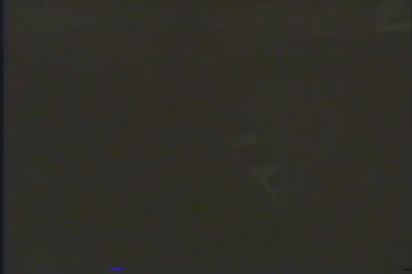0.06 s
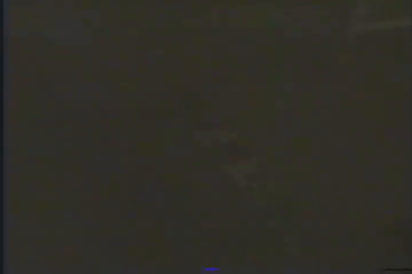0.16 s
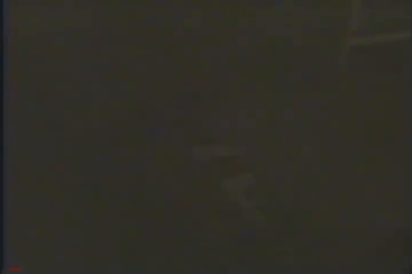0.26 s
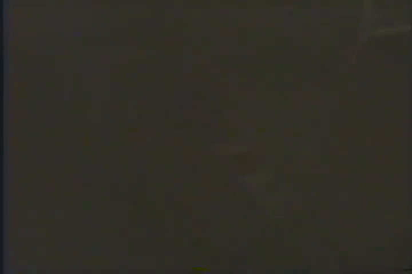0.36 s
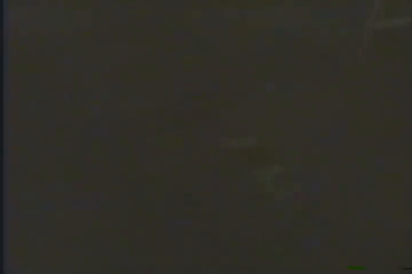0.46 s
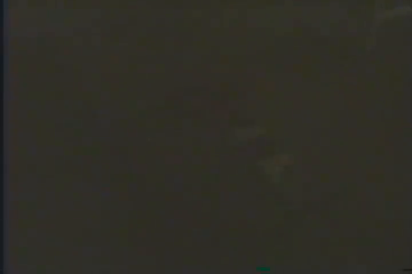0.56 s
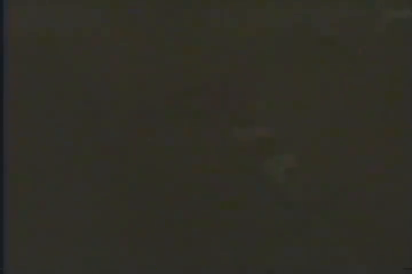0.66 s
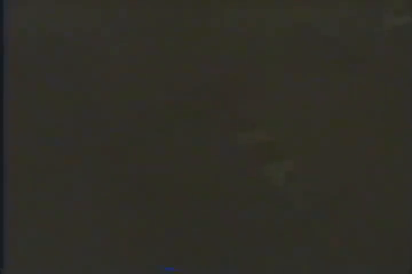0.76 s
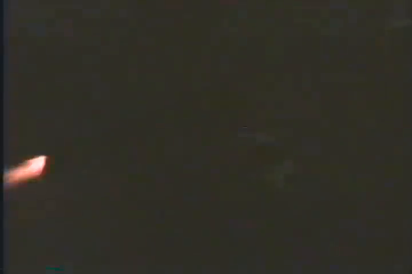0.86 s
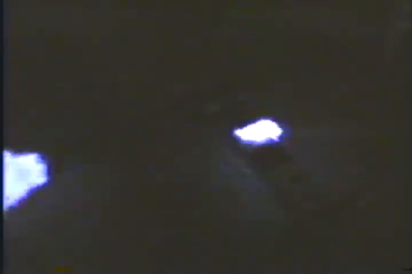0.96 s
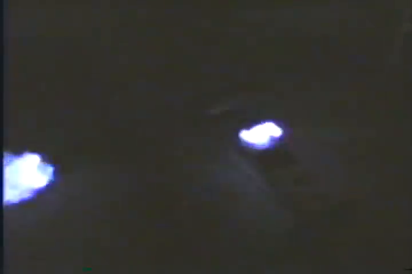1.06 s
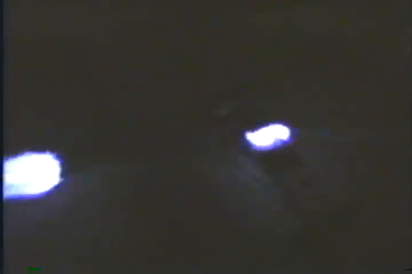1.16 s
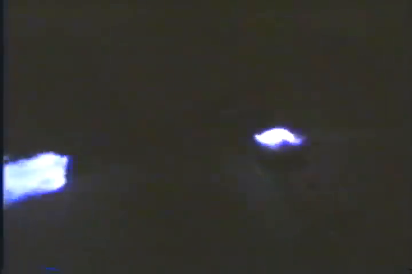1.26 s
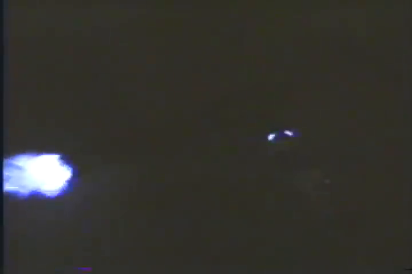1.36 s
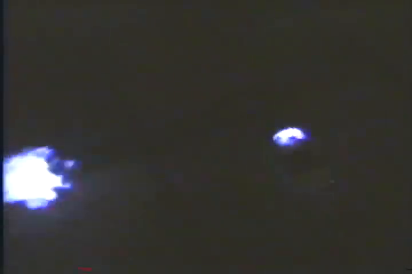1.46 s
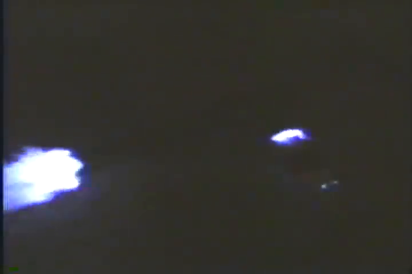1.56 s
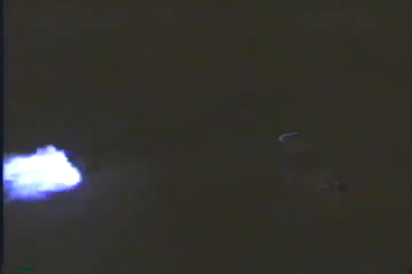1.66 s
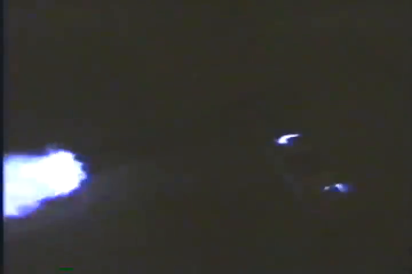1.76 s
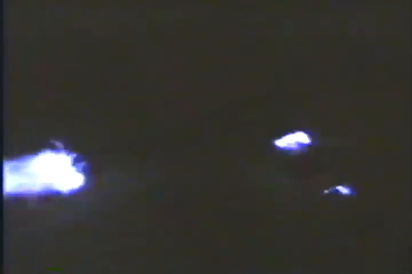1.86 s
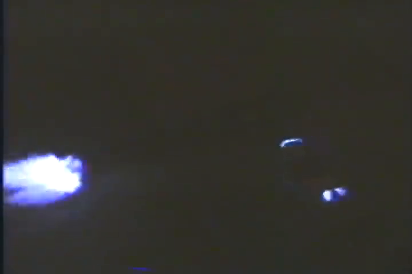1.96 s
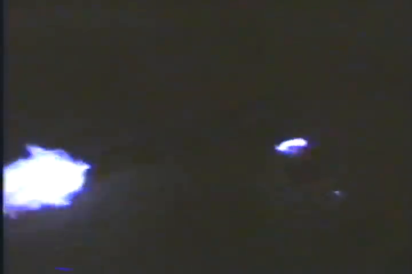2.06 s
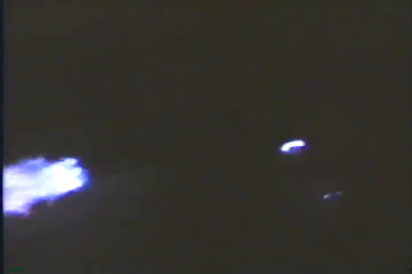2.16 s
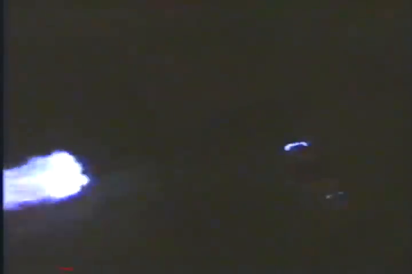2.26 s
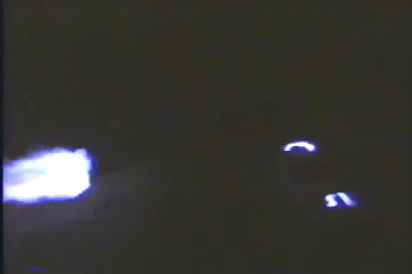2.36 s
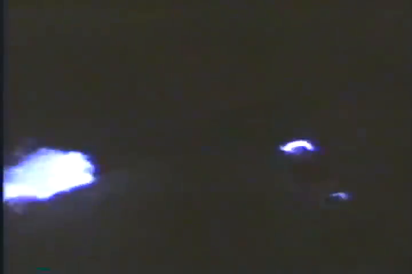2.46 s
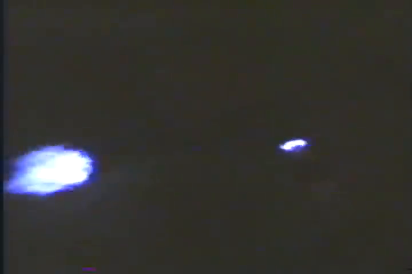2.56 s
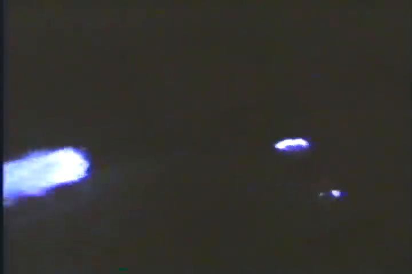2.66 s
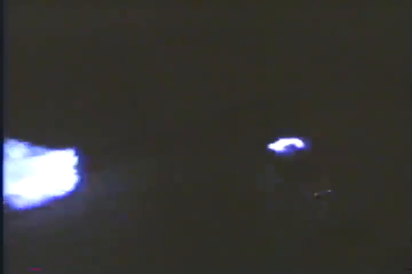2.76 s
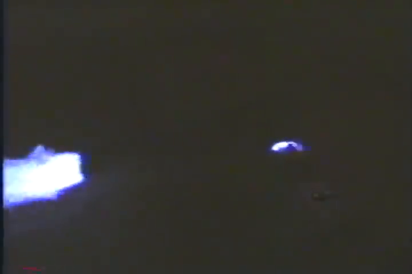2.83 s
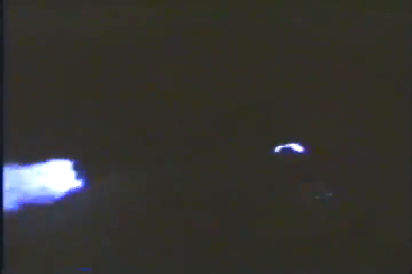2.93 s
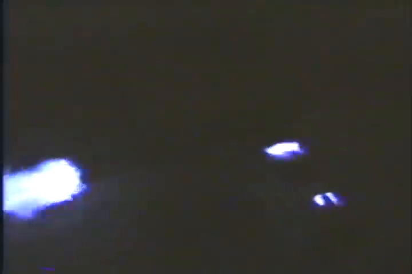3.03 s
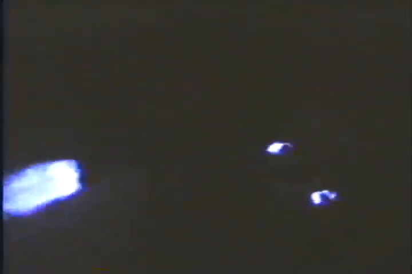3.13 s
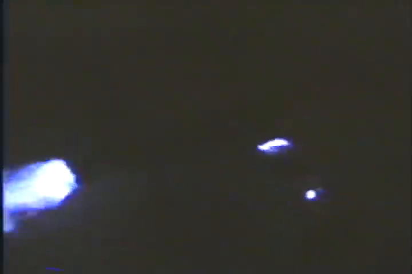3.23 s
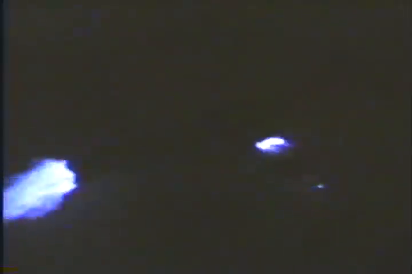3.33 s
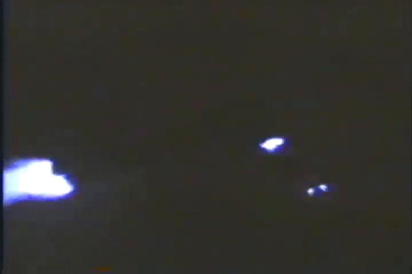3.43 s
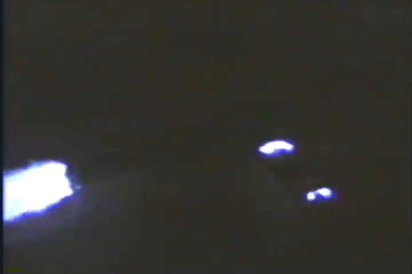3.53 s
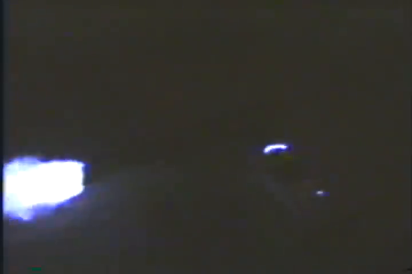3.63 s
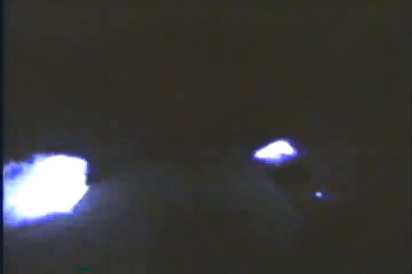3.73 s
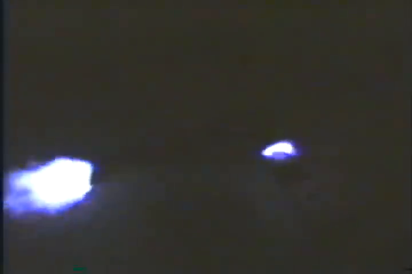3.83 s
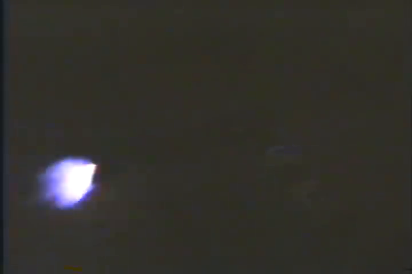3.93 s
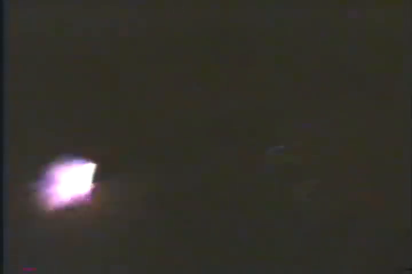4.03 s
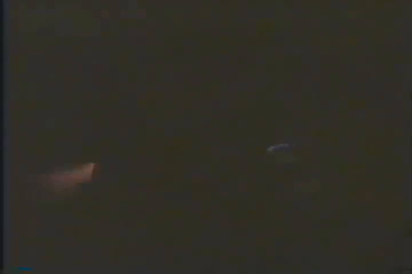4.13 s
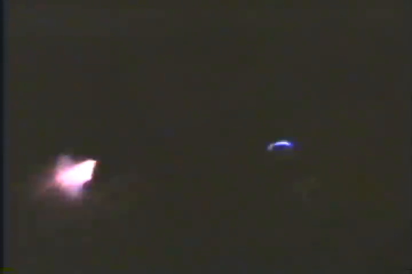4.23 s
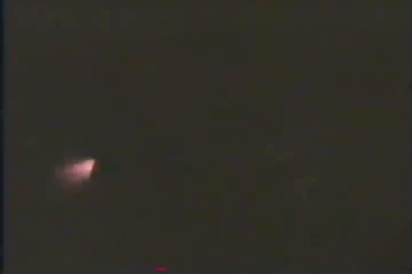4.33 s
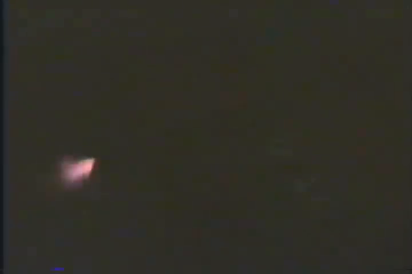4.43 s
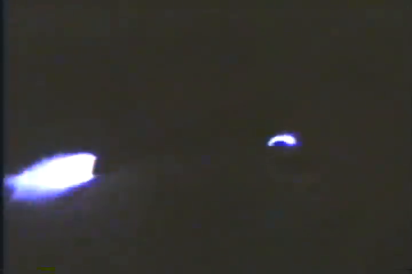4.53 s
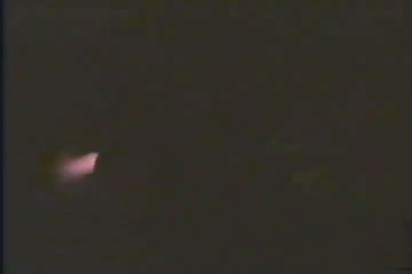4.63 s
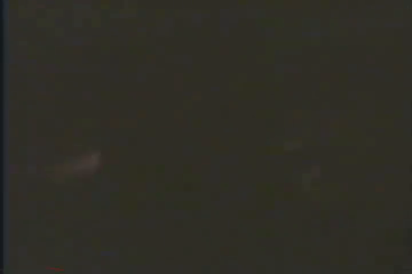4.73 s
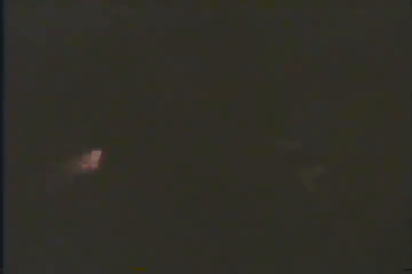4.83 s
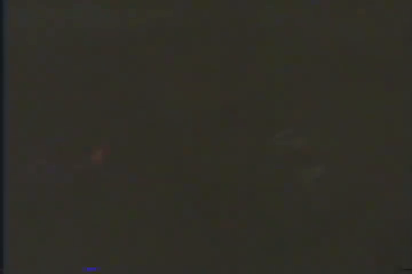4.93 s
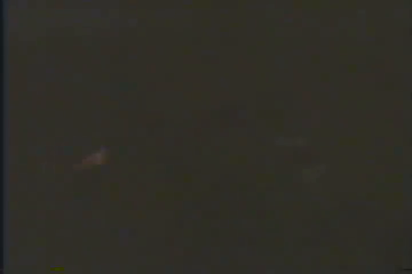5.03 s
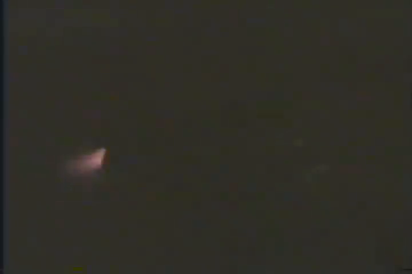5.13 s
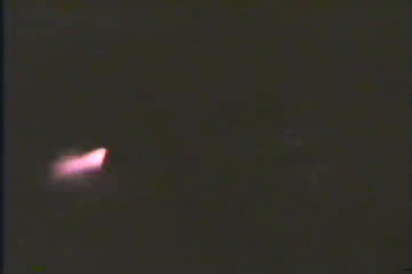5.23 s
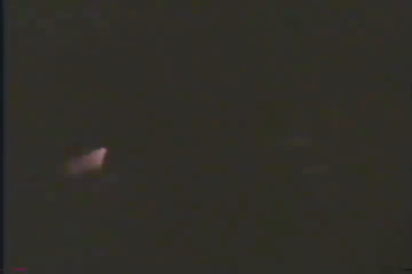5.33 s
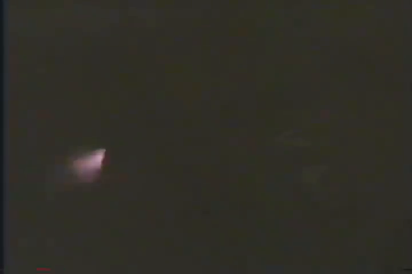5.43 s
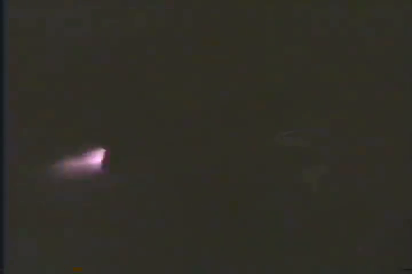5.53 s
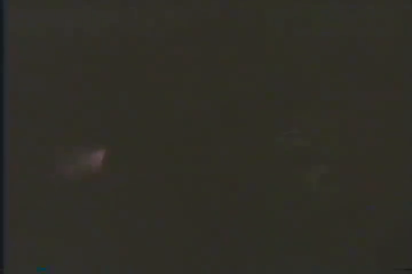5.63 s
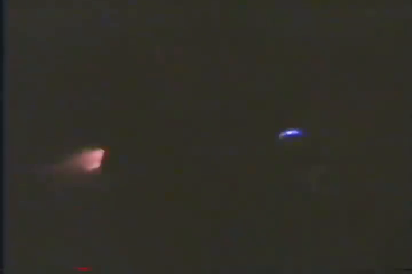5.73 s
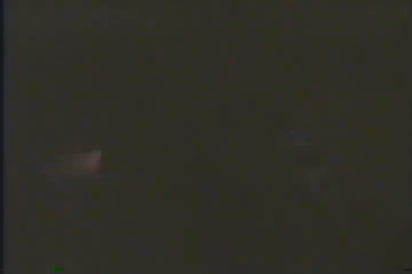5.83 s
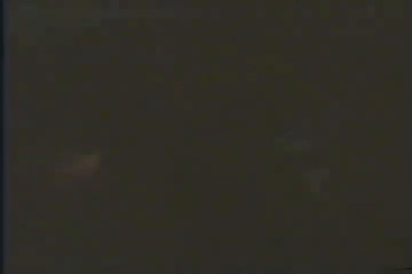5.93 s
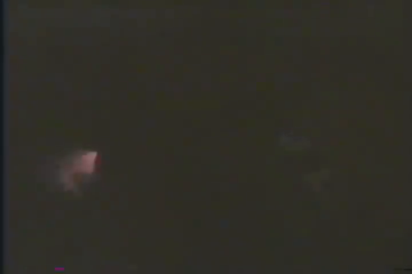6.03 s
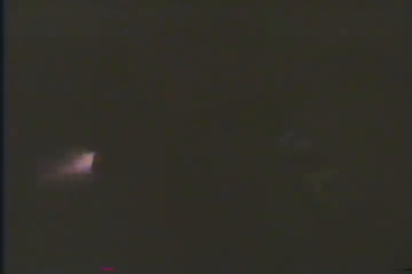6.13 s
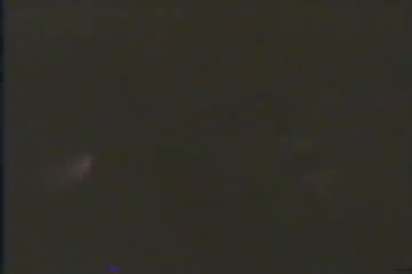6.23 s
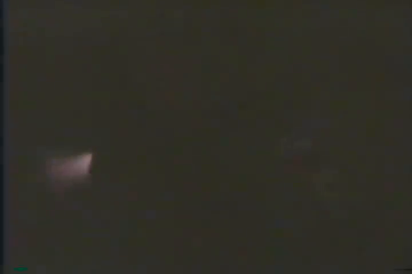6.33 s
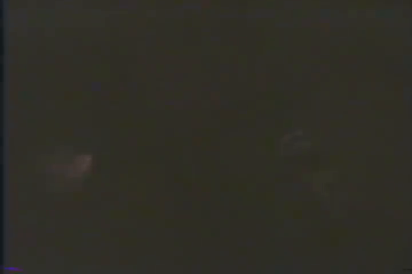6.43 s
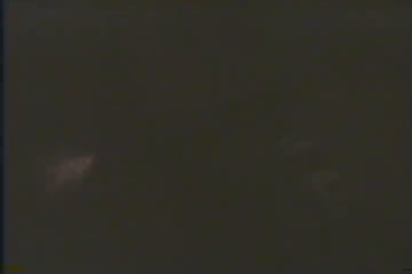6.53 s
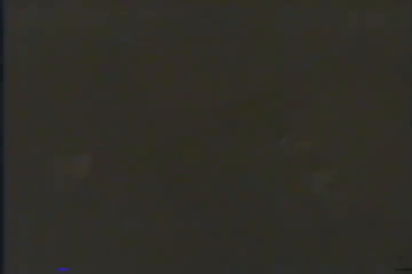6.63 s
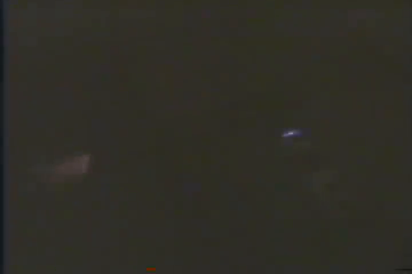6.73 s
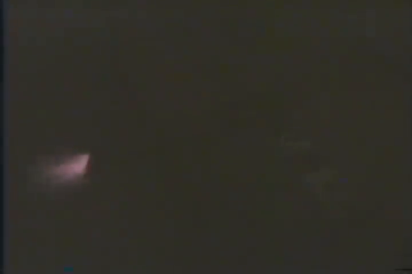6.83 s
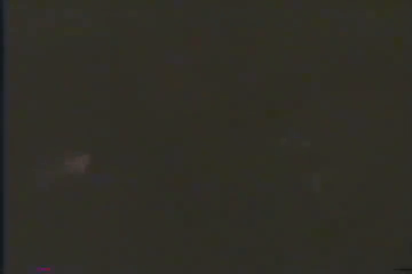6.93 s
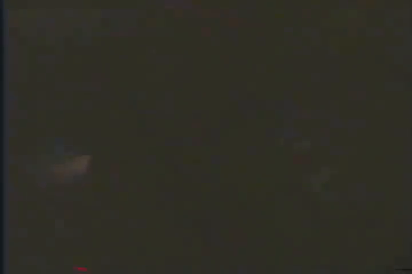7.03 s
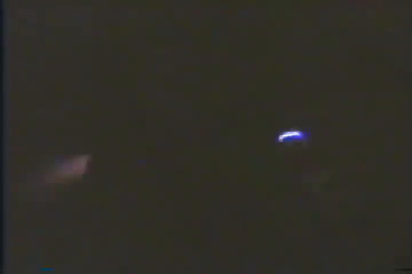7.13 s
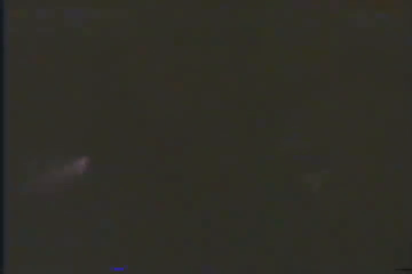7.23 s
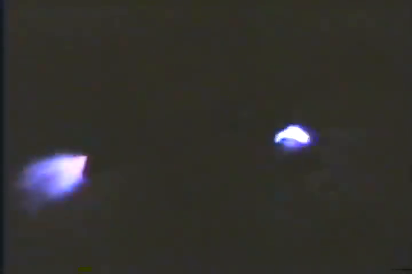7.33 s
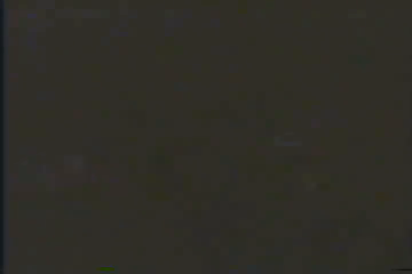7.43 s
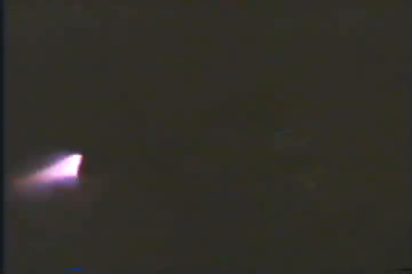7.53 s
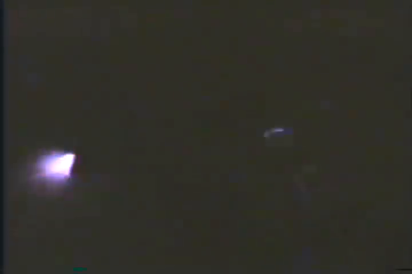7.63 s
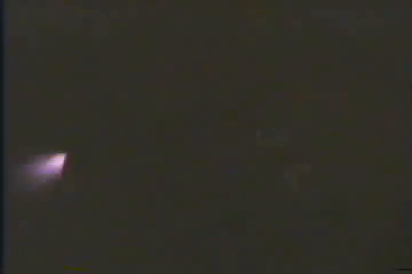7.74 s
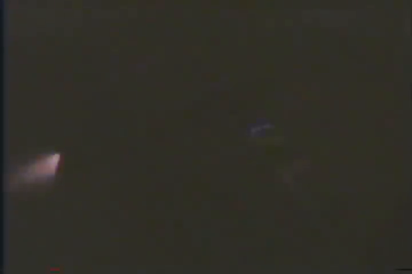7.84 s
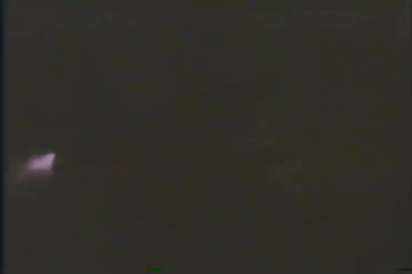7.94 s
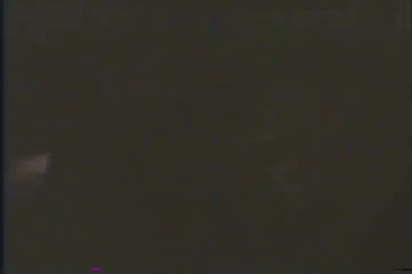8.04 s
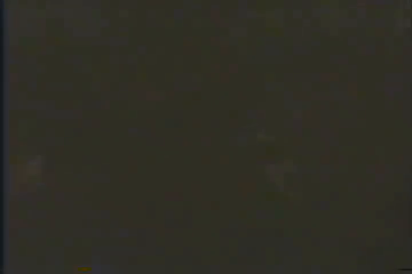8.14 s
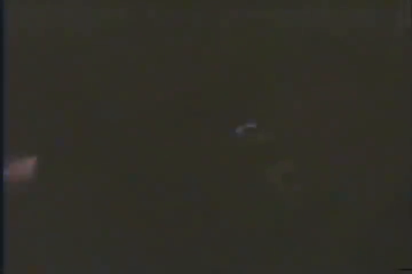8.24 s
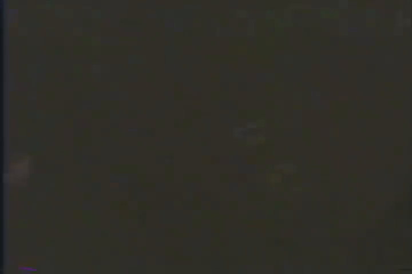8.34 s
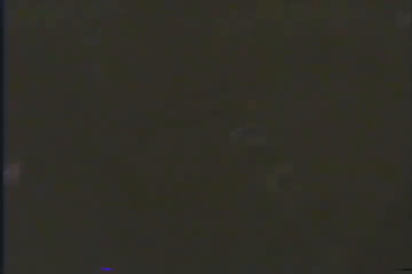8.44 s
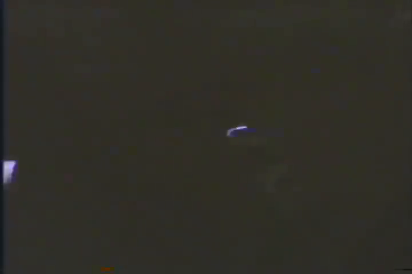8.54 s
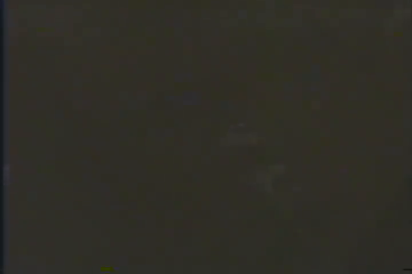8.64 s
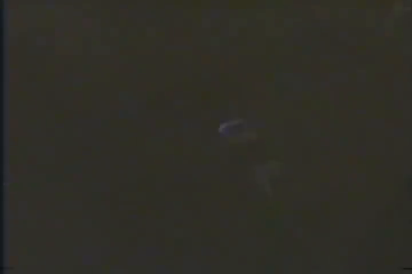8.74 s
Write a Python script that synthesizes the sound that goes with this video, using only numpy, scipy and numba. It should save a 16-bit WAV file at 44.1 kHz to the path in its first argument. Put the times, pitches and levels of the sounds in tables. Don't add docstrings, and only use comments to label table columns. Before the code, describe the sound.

Valve clicks and a rising cold gas hiss, then a bang lights a jet burner that sputters in puffs and locks into a loud distorted roar.

```python
import sys
import numpy as np
from scipy import signal
from scipy.fft import rfft, irfft, next_fast_len
from scipy.io import wavfile
from scipy.ndimage import uniform_filter1d
from numba import njit

SR = 44100
rng = np.random.default_rng(int(sys.argv[2]) if len(sys.argv) > 2 else 0)


def magnitude_from_level(level_db):
    exponent = np.asarray(level_db, float) / 20
    return 10 ** exponent


def wav_record(signal):
    frames = np.transpose(np.atleast_2d(signal))
    bounded = np.clip(frames, -1, 1)
    quanta = np.round(bounded * 32767).astype(np.int16)
    wavfile.write(sys.argv[1], SR, quanta)


N = 387638
T = np.arange(N) / SR
IGNITION_S = .908
PIPE_HZ = 206
CRACK_LEAD_S = 0.00636

# start_s, lower_hz, upper_hz, upper_over_lower_db
PIPE_MODES = [(4.0, 133.8, 196.7, 14), (4.25, 138.5, 193.6, -5.5), (4.6, 144.2, 188.6, 0),
              (4.8, 152.3, 183, -8), (5.45, 151.9, 183, -7.5), (5.7, 139.5, 195.7, -2.5),
              (6.0, 130.8, 187, 3.5), (6.5, 137, 196.7, 5), (6.9, 147.4, 194.7, 2.5), (7.2, 137, 189.7, 5),
              (7.5, 145.4, 197.5, 1.5), (8.15, 132.5, 205, 3.5), (8.45, 136.5, 195.3, 3.5),
              (8.79, 143, 195.1, 4.5)]
# start_s, peak_db
SURGES = [(4.109, -19), (4.303, -27), (4.579, -11.5), (4.732, -19.5), (4.809, -10), (4.871, -14),
          (4.981, -14), (5.194, -7.5), (5.338, -14), (5.553, -12), (5.615, -16), (5.783, -15.5),
          (6.215, -12), (6.39, -19.5), (6.457, -24), (6.51, -27.5), (6.74, -18), (6.934, -12.5),
          (7.293, -14), (7.531, -16), (7.651, -30), (7.824, -24), (7.863, -18), (8.038, -17.5),
          (8.117, -22), (8.414, -14), (8.608, -17.5), (8.689, -5.5)]
# start_s, level_db
BURN = [(.95, -1), (1.2, 5), (1.5, -5.5), (1.9, -6), (2.1, -6.5), (2.45, 2.5), (2.75, -3.5), (3.35, 0.5),
        (3.55, -3.5), (3.95, 3.5), (4.2, -1.5), (4.85, 2.5), (5.55, 2.5), (5.75, 0), (6.75, -2), (6.95, 0),
        (8.5, -.6), (8.7, 0)]
# pitch_hz, level_db (per Hz)
JET_COLOUR = [(300, -28), (600, 1.5), (1000, -3), (2000, -11.5), (4000, -13), (7000, -19), (10000, -22),
              (12500, -33), (15000, -80)]
# pitch_hz, level_db (per Hz)
FLAME_COLOUR = [(240, 2), (400, 2.5), (531, -10), (663, -3), (1120, -7), (1550, -3), (2310, -14.5),
                (4660, -18), (11000, -35), (14000, -46)]
# pitch_hz, width_hz, lift_db
FLAME_DUCT = [(673, 45, 9), (829, 30, 5), (950, 40, 8), (1350, 200, 3), (1650, 200, 2.5), (1950, 250, 4),
              (3200, 300, 7), (4180, 280, 7)]
# pitch_hz, level_db (per Hz)
RUMBLE_COLOUR = [(12, -79), (20, -30), (38, -7.5), (75, -3), (108, -11), (135, 1), (206, 0.5), (292, -11.5),
                 (500, -58), (650, -78), (1100, -120)]
# crest_s, peak_db, pitch_hz, crack_db
PUFFS = [(1.014, -3.5, 206, -21), (1.112, -11, 207, -40), (1.127, -9, 234, -32), (1.151, -7, 190, -43),
         (1.175, -2.5, 197, -44), (1.201, -7, 157, -36), (1.297, -7, 205, -22.5), (1.333, -7.5, 151, -38),
         (1.444, -11, 241, -22.5), (1.592, -3.5, 191, -24), (1.614, -4, 224, -15), (2.014, -10.5, 144, -40),
         (2.183, -11, 209, -40), (2.408, -8.5, 206, -43), (2.469, -6.5, 212, -38), (2.514, -12, 206, -40),
         (2.536, -10, 193, -20), (2.839, -10.5, 225, -40), (2.901, -8, 205, -35), (3.235, -8, 226, -29),
         (3.341, -3, 186, -44), (3.423, -8.5, 215, -23), (3.589, -10.5, 206, -25), (3.709, -11.5, 207, -40),
         (3.746, -1.1, 229, -11), (3.863, -4, 172, -13.5), (3.941, -6.5, 217, -16.5),
         (3.957, -7.5, 215, -27), (3.998, -11, 193, -40), (4.029, -8, 188, -44)]
# start_s, crack_db, puff_db
CRACKS = [(0.9, -2, -40), (.939, -8, -40), (1.058, -18.5, -35), (1.094, -21, -12), (1.412, -24, -22),
          (1.5598, -19, -14), (1.7285, -34, -24), (1.8072, -22.5, -21), (1.8351, -28, -10),
          (1.87, -38, -32), (1.914, -28, -13.5), (1.9963, -18.5, -13), (2.149, -23, -16.5),
          (2.1955, -19.5, -14.5), (2.358, -22, -22), (2.575, -22, -12), (2.642, -21, -12.5),
          (2.8474, -24, -15), (2.938, -21, -21), (3.092, -35, -16), (3.1137, -18, -17), (3.156, -18.5, -28),
          (3.2903, -15.5, -14.5), (3.3719, -19.5, -15), (3.4826, -29, -19), (3.722, -22, -19),
          (3.836, -19, -9), (3.8963, -28, -9), (3.914, -15, -32), (3.9725, -26, -6.5)]
# pitch_hz, level_db (per Hz)
GAS_COLOUR = [(41, -68), (70, -38), (130, -31), (309, -41), (345, -8.5), (526, -16), (916, -14),
              (1070, -1.5), (2030, -10), (2780, -7), (4050, -7), (5520, -11), (6440, -15.5), (10300, -21),
              (14000, -32.5)]
# pitch_hz, width_hz, lift_db
GAS_DUCT = [(1040, 25, 6), (1097, 25, 9), (1330, 40, 7), (2420, 25, 8), (2625, 25, 4), (2830, 45, 7),
            (3440, 40, 6), (3930, 150, 4), (2050, 250, -5), (5450, 300, -5), (6550, 250, 4), (8100, 300, 5),
            (8750, 400, -6)]
# start_s, level_db
GAS_LEVEL = [
    (.37, -60),
    (.42, -42),
    (.47, -39.5),
    (.54, -31),
    (.6, -23),
    (.67, -22),
    (.75, -20),
    (.83, -19),
    (.91, -18),
]
# start_s, peak_db, pitch_hz
CLICKS = [(.03, -13.5, 735), (.054, -20, 1200), (0.098, -20, 3770), (0.097, -14.5, 1190), (.15, -33, 4500),
          (.199, -22, 1200), (.279, -28, 950), (.328, -26, 1300), (0.364, -20, 1270), (.4105, -20, 3500),
          (.467, -23, 2600), (0.501, -25, 1500), (0.748, -3, 1270), (7.992, -13.5, 2780)]
# start_s, level_db (over the yard)
RUSTLES = [
    (.025, -3),
    (.045, 3),
    (.092, 0),
]
# pitch_hz, level_db (per Hz)
YARD_COLOUR = [(24, -49), (40, -17), (114, 1.5), (435, -9.5), (490, -4.5), (653, -7), (890, -4), (956, -9),
               (1160, -10.5), (1820, -15.5), (2670, -23.5), (3390, -23), (12000, -42), (15600, -68),
               (22000, -120)]
# start_s, level_db
CEILING = [(0, -4.5), (.93, -4.5), (3.76, -3), (4.1, -9.1), (8.79, -9.2)]
# pitch_hz, level_db (per Hz)
TAPE_COLOUR = [(3530, -34), (6000, -2.5), (10800, -4.5), (12600, -10), (14500, -24)]
# pitch_hz, level_db (per Hz)
WOW_COLOUR = [(12, -27), (22, -10), (35, 7), (60, 0), (100, -53)]


def level(x, db):
    return x * magnitude_from_level(db) / np.sqrt(np.mean(x ** 2))


def curves(table, before_db=None):
    s, *columns = np.transpose(table)
    return [np.interp(T, s, c, left=before_db) for c in columns]


@njit
def svf(x, hz, width):
    y, b, l = np.empty(len(x)), 0., 0.
    for i in range(len(x)):
        g, k = np.tan(np.pi * hz[i] / SR), width / hz[i]
        v = (b + g * (x[i] - l)) / (1 + g * (g + k))
        b, l, y[i] = 2 * v - b, l + 2 * g * v, k * v
    return y


def walk(rate):
    hold = int(SR / rate)
    steps = np.repeat(rng.standard_normal(N // hold + 1), hold)
    return 1.003 * uniform_filter1d(uniform_filter1d(steps, hold), hold)[:N]


def noise(spectrum, duct=(), flicker_db=0., rate=20.):
    size = next_fast_len(N)
    f = np.maximum(np.fft.rfftfreq(size, 1 / SR), 1)
    hz, db = np.transpose(spectrum)
    colour = np.interp(np.log(f), np.log(hz), db)
    for centre, width, lift_db in duct:
        colour = colour + lift_db / (1 + (2 * (f - centre) / width) ** 2)
    full = rfft(rng.standard_normal(size)) * magnitude_from_level(colour)
    shared, out = walk(rate), 0
    for octave in range(4, 15):
        weight = np.clip(1 - np.abs(np.log2(f) - octave), 0, 1)
        band = irfft(full * weight, size)[:N]
        out = out + band * magnitude_from_level(flicker_db * (shared + 0.97 * walk(rate)))
    return level(out, 0)


def bursts(rows, rise_s, fall_s):
    env, u = np.zeros(N), np.arange(int(0.047 * SR)) / SR
    shape = np.minimum(u / rise_s, 1) * np.exp(-np.maximum(u - rise_s, 0) / fall_s)
    for s, db, *_ in rows:
        i = int(s * SR)
        env[i:i + len(u)] += magnitude_from_level(db) * shape[:N - i]
    return env


def roar():
    start = np.clip((T - 3.99) / 0.14, 0, 1)
    third_hz, third_db = curves([(4, 263.3, -19.5), (5.5, 263.5, -21.5), (6.5, 278, -24), (8.79, 256.3, -25.5)])
    third = mode(third_hz, third_db, 37.0, 0.076)
    low_hz, high_hz, trade_db = curves(PIPE_MODES)
    trade_db = trade_db + 2.8 * walk(18)
    modes_db, wander = -19, .02
    low = mode(low_hz * (1 + wander * walk(16)), modes_db - trade_db / 2, 15., 0.22)
    high = mode(high_hz * (1 + wander * walk(16)), modes_db + trade_db / 2, 14.55, 0.28)
    push_db = 2 + 0.94 * curves(BURN)[0] + 0.73 * walk(30)
    return start * magnitude_from_level(push_db) * surging() * (magnitude_from_level(8.0) * low + magnitude_from_level(5.0) * high + third)


def mode(hz, db, width_hz, steady):
    ring = svf(svf(rng.standard_normal(N), hz, width_hz), hz, 3 * width_hz)
    ring = level(ring, 0)
    power = uniform_filter1d(ring ** 2, 1200)
    return magnitude_from_level(db) * level(ring / (power + 0.11) ** steady, 0)


def surging():
    lead_s, lull_s, depth = 0.0076, .005, 0.57
    lull = sum(np.exp(-.5 * ((T - s + lead_s) / lull_s) ** 2) for s, _ in SURGES)
    return 1 - np.clip(depth * lull, 0, 1) + magnitude_from_level(14.5) * bursts(SURGES, rise_s=0.0021, fall_s=0.012)


def flame(rows):
    locked = np.clip((T - 3.92) / 0.24, 0, 1)
    burn_db, = curves(BURN)
    flare_db = 6 * np.exp(-np.abs(T - IGNITION_S) / 0.048)
    opening_db = 3.5 * np.clip(T - 2.9, 0, 1)
    sputter_db = -35 + flare_db + opening_db + 0.26 * walk(8.1)
    sputter = magnitude_from_level(sputter_db) * noise(FLAME_COLOUR, FLAME_DUCT, flicker_db=1.6, rate=75.0)

    tearing = 1 + magnitude_from_level(5) * bursts(SURGES, rise_s=0.0018, fall_s=0.002)
    jet = magnitude_from_level(-33.5 + 2 * burn_db) * tearing * noise(JET_COLOUR, flicker_db=1.5, rate=70.)

    sputter_rumble_db, roar_rumble_db = -22 + .6 * burn_db, -12.5 + 0.94 * burn_db
    rumble_db = sputter_rumble_db + locked * (roar_rumble_db - sputter_rumble_db)
    rumble = magnitude_from_level(rumble_db) * noise(RUMBLE_COLOUR, flicker_db=3.0, rate=30.)

    scatter_db = 3.5 * np.tanh(rng.standard_normal(len(rows)))
    spits = [(s - .0075, min(db, -8.5) - 19.0 + extra) for (s, db, _), extra in zip(rows, scatter_db)]
    fronts = [row[:2] for row in CRACKS] + [(s - CRACK_LEAD_S, db) for s, *_, db in PUFFS]
    fronts = [(s - .0015, db - 4.0) for s, db in fronts]
    cracking = bursts(spits, 0.0043, 0.0021) + bursts(fronts, 0.0024, 0.0018)
    burning = (1 - locked) * sputter + locked * jet + rumble
    return burning * (T > IGNITION_S) + cracking * noise(FLAME_COLOUR)


def all_puffs():
    named = [row[:3] for row in PUFFS] + [(s + CRACK_LEAD_S, db, PIPE_HZ) for s, _, db in CRACKS]
    count, from_s, gap_s, clear_s = 160, .99, .0195, .011
    late, size, pitch = rng.standard_normal((count, 3)).T
    s = from_s + gap_s * (np.arange(count) + 0.201 * late)
    db = -18 + 0.87 * np.interp(s, *np.transpose(BURN)) + 3 * size
    hz = PIPE_HZ + 22. * pitch
    free = np.abs(s[:, None] - np.array(named)[:, 0]).min(axis=1) > clear_s
    return named + list(np.transpose([s, db, hz])[free])


def puffs(rows):
    out, u = np.zeros(N), np.arange(-600, 2400) / SR
    swell = np.exp(-.5 * (u / 0.0022) ** 2)
    swell = swell + 0.44 * np.exp(-np.abs(u) / np.where(u > 0, .014, .002))
    for s, db, hz in rows:
        i = int((s - .0008) * SR) - 600
        out[i:i + len(u)] += magnitude_from_level(db - 0.9) * swell * np.cos(2 * np.pi * hz * u + 1.26)
    return out


def bang():
    u = np.maximum(T - .8975, 0)
    swing = magnitude_from_level(4.0) * (u / 0.011) * np.exp(1 - u / 0.0053) + magnitude_from_level(-1.0) * np.exp(-u / 0.041)
    swing = swing * np.sin(2 * np.pi * 195. * u)
    late = np.maximum(T - .903, 0)
    thump = magnitude_from_level(8.0) * np.exp(-late / 0.013) * np.sin(2 * np.pi * 58.0 * late)
    crack_noise = noise([(100, -28), (500, 9), (1500, -1), (4000, -12), (12000, -30)])
    ragged = magnitude_from_level(2.0) * bursts([(.898, 0)], 0.011, 0.0022) * crack_noise
    v = np.maximum(T - .9335, 0)
    ring = magnitude_from_level(-4.5) * np.exp(-(v / 0.033) ** 2) * np.sin(2 * np.pi * (225. * v + 950.0 * v ** 2))
    return ring - swing + thump + ragged


def gas():
    hiss = noise(GAS_COLOUR, GAS_DUCT, flicker_db=.25, rate=30.)
    lows = signal.sosfilt(signal.butter(1, 4600., fs=SR, output="sos"), hiss)
    db, = curves(GAS_LEVEL, before_db=-80)
    muted_db, full_db = -7.5, 1.4
    tone_db = muted_db + (full_db - muted_db) * (1 + np.tanh((T - 0.648) / 0.033)) / 2
    return magnitude_from_level(db) * (hiss + (magnitude_from_level(tone_db) - 1) * lows) * (T < IGNITION_S)


def clicks():
    out, u = np.zeros(N), np.arange(1500) / SR
    for s, db, hz in CLICKS:
        tick = rng.standard_normal(len(u)) * np.exp(-u / 0.0021)
        centre = np.full(len(u), 1. * hz)
        tick = svf(svf(tick, centre, 0.67 * hz), centre, 0.67 * hz)
        i = int(s * SR)
        out[i:i + len(u)] += magnitude_from_level(db - 3.5) * tick / np.abs(tick).max()
    return out


def yard():
    draught_db = 29 * np.maximum(T - 0.57, 0)
    stir = 1 + bursts(RUSTLES, 0.0048, 0.014)
    air = noise(YARD_COLOUR, [(2700., 50.0, 6.5), (116.0, 16.0, 7.8)], rate=19.4)
    return magnitude_from_level(-34.5 + draught_db) * stir * air * (T < IGNITION_S)


def scene():
    rows = all_puffs()
    air = roar() + flame(rows) + puffs(rows) + bang() + gas() + clicks() + yard()
    return np.array([air, air])


def roll_off(x):
    return signal.sosfilt(signal.butter(12, 15790, fs=SR, output="sos"), x)


def record(dry):
    top = magnitude_from_level(curves(CEILING)[0])
    x = signal.lfilter(*signal.butter(1, 62., "high", fs=SR), np.clip(dry, -top, top))
    w, wind_cut_q = 2 * np.pi * 103., .69
    x = signal.lfilter(*signal.bilinear([1, 0, 0], [1, w / wind_cut_q, w * w], SR), x)
    x = signal.sosfilt(signal.butter(3, 9500., fs=SR, output="sos"), x)
    x = x + magnitude_from_level(-61) * noise(TAPE_COLOUR) + magnitude_from_level(-55.5) * noise(WOW_COLOUR)
    x = x + magnitude_from_level(-76.) * np.sin(2 * np.pi * 15734.3 * T)
    bass = signal.sosfilt(signal.butter(1, 450., fs=SR, output="sos"), x)
    x = x + magnitude_from_level(-38.0) * np.array([[1], [-1]]) * bass + magnitude_from_level(-80.5) * rng.standard_normal((2, N))
    fade = np.clip((T[-1] - T) / .003, 0, 1)
    return roll_off(np.clip(x, -.97, .97) * fade)


dry = scene()
out = record(dry)
wav_record(out)
```